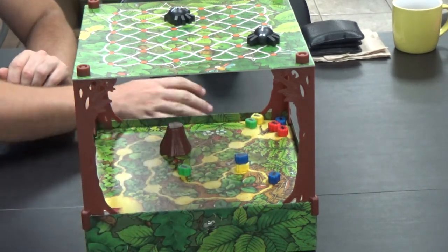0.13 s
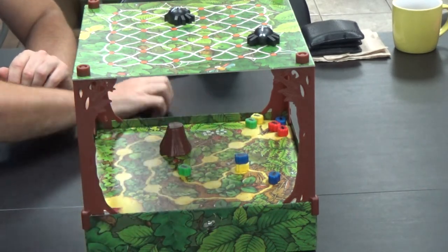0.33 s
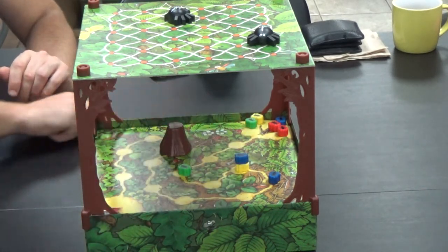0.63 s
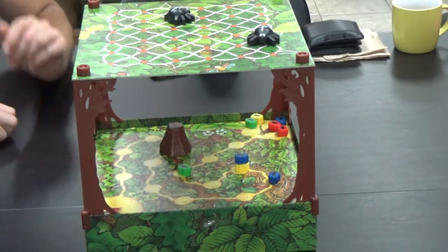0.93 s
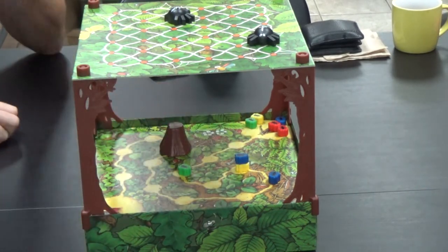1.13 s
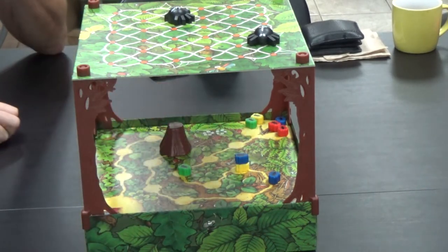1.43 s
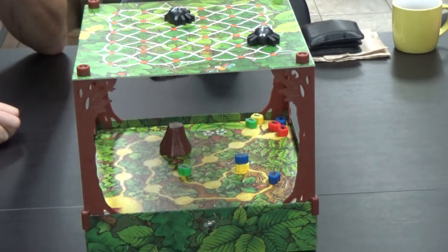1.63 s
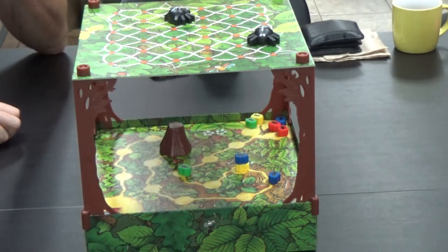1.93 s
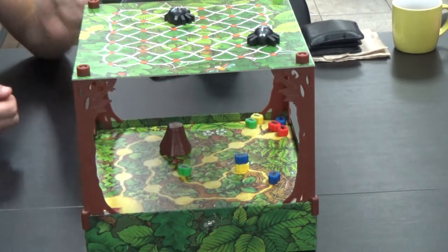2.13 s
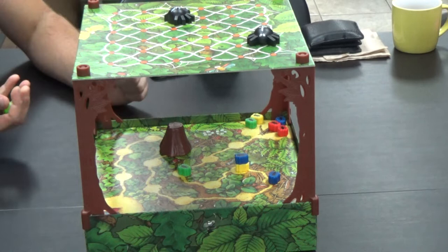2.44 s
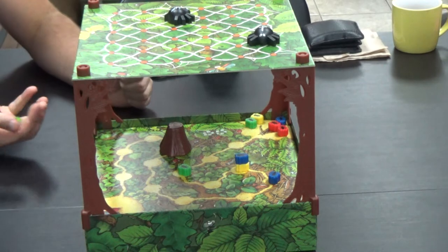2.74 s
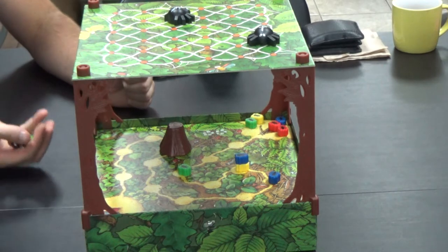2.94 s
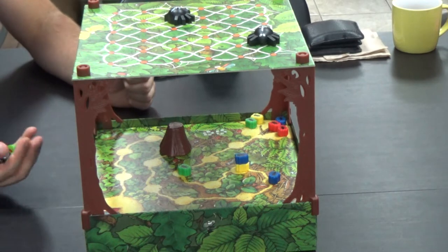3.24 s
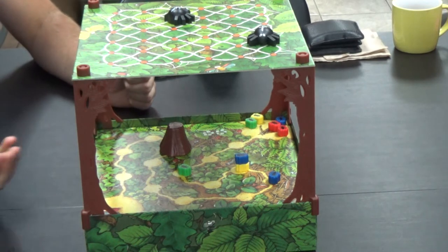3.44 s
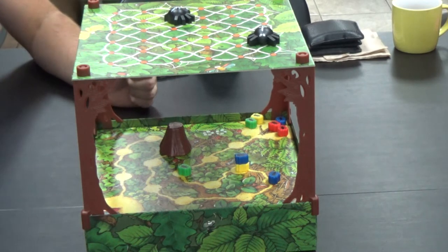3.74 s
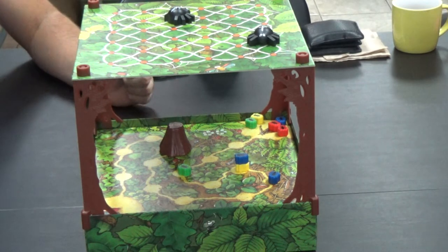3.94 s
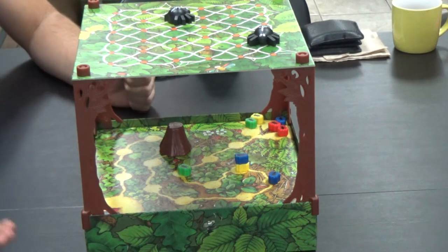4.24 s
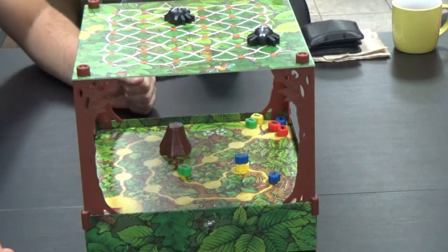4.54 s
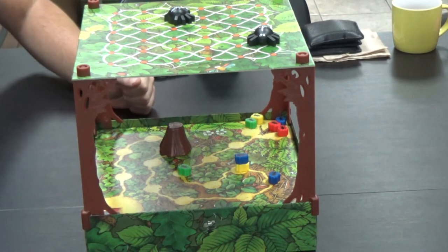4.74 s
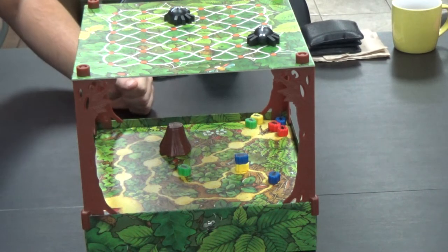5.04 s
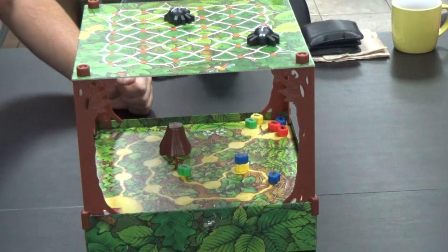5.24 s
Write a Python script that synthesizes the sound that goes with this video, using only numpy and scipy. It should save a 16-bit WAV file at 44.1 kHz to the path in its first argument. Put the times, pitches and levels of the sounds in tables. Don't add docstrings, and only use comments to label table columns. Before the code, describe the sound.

In a quiet humming room, small dice drag and click, a thin chain ticks, dice rattle in a hand and clatter out.

```python
import sys
import numpy as np
from scipy import signal
from scipy.io import wavfile
from scipy.ndimage import uniform_filter1d, minimum_filter1d

SR = 44100
rng = np.random.default_rng(int(sys.argv[2]) if len(sys.argv) > 2 else 0)


def gain_from_db(level_db):
    decades = np.asarray(level_db, float) / 20
    return 10 ** decades


def log_audio(samples):
    frames = np.atleast_2d(samples).T
    limited = np.clip(frames, -1, 1)
    pcm = np.round(limited * 32767).astype(np.int16)
    wavfile.write(sys.argv[1], SR, pcm)


N = 236947

# [f/Hz, level/dB per Hz]
AIR_COLOUR = [(18, -22), (28, -13), (42, -4), (62, -1.5), (100, -.5), (160, -2), (250, -8), (400, -12),
              (700, -16), (1700, -22), (4000, -26), (9000, -30), (13000, -32.5), (16000, -35)]
# [f/Hz, likeness/0-1]
AIR_SAME = [(30, .9995), (150, .999), (400, 0.73), (1200, 0.27), (4000, 0.48), (8000, .8), (12000, .97)]
# [f/Hz, level/dB rms, width/Hz]
HUM_TONES = [(119.5, -57, 13), (244.6, -73, 6.4), (357, -72.5, 5.4)]
# [f/Hz, t60/s]
ROOM_T60 = [(300, 0.26), (1500, 0.48), (3500, 0.36), (7000, 0.38), (12000, 0.2)]
# [f/Hz, level/dB]
ROOM_COLOUR = [(300, 6.5), (1500, 4.5), (3000, 1.5), (6000, -2.5), (9000, 0), (14000, 6.5)]
# [f/Hz, likeness/0-1]
ROOM_SAME = [(300, 1), (1200, 0.81), (4000, 0.74), (10000, 0.79)]
# [delay/ms, level/dB]
WALLS = [(3.1, -18), (5.2, -20), (7.3, -19), (15.2, -16)]
# [t/s, level/dB]
RUB_LEVEL = [(0.0, -51.5), (0.43, -43.5), (0.61, -47), (1.27, -58.5), (2.36, -62.5), (2.94, -68),
             (3.26, -65.5), (3.56, -66), (4.58, -59.5), (4.7, -48), (4.76, -49), (4.89, -43), (5.1, -61),
             (5.37, -60)]
# [f/Hz, level/dB per Hz]
RUB_COLOUR = [(180, -1), (300, 1.5), (600, -2), (1200, -3.5), (2500, -8.5), (4000, -11.5), (9000, -12),
              (12500, -26), (15500, -25)]
# [t/s, level/dB]
DRAG_LEVEL = [
    (0.0, -39),
    (0.062, -49),
    (0.072, -31),
    (0.184, -62),
    (0.254, -34),
    (0.42, -37),
    (0.49, -31.5),
    (0.53, -64),
    (0.62, -43),
]
# [t/s, first link level/dB, length/s]
WRIST_TURNS = [
    (1.1435, -38, .03),
    (1.313, -37, .09),
    (1.489, -39.5, .03),
    (1.677, -39, .08),
    (1.893, -40, .07),
]
# [f/Hz, level/dB, t60/s]
CHAIN_MODES = [(1200, -2, .012), (1500, -2, .012), (1820, -4, .015), (2145, -5, .04), (2960, -14, .035),
               (4780, -16, .04), (5340, -6, .12)]
# [t/s, level/dB]
KNUCKLE_TAPS = [
    (1.9773, -39.5),
]
# [f/Hz, level/dB, t60/s]
KNUCKLE_MODES = [(270, -1, 0.045), (487, -1, 0.037), (720, 2, 0.024), (1510, 2.5, 0.021), (1660, 0, 0.017),
                 (2400, 7.5, 0.0083)]
# [f/Hz, level/dB, t60/s]
TABLE = [(296.3, -24, 0.048), (480, -14.5, 0.043), (696, -16.5, 0.05), (1270, -8, 0.039),
         (1456, -1.5, 0.021), (2730, 3, 0.053), (3630, 1.5, 0.026), (4750, -11, 0.024), (7600, -5, 0.0087),
         (10800, -9, 0.007), (12960, -36, 0.0049)]
# [f/Hz, level/dB, t60/s]
PALM = [(971, -14, 0.024), (1700, -17, 0.014), (2180, 4.5, 0.0059), (3400, 0.5, 0.017), (5370, 3.5, 0.016),
        (9900, -4.5, 0.0041), (13600, -54, .003)]
# [t/s, click level/dB, click f/Hz, blow force level/dB]
SWEEP_HITS = [(0.0736, -21.5, 3030, -26), (0.0913, -42, 2920, -36), (0.112, -38, 3000, -48),
              (0.1705, -44, 6940, -48), (0.2216, -42, 2890, -26), (0.2367, -45, 2830, -45),
              (0.2568, -15, 4640, -10), (0.2603, -15, 4010, -31), (0.2862, -37, 3340, -35),
              (0.309, -25, 3550, -20), (0.3148, -13, 6200, -8), (0.3176, -13.5, 3860, -9.5),
              (0.3312, -38, 3100, -14), (0.3659, -25, 3230, -11), (0.3899, -13.5, 4460, -10),
              (0.4049, -11.5, 5900, -9), (0.4197, -32, 4360, -35), (0.4679, -15, 5800, -4),
              (0.4744, -24, 5900, -14), (0.4958, -29, 4440, -36), (0.9626, -41, 5850, -25),
              (0.9897, -46, 5880, -29.5), (1.0268, -45, 4100, -39), (2.796, -58, 2200, -36)]
# [t/s, click
# level/dB, click f/Hz, blow force level/dB]
PALM_HITS = [(1.2035, -29.5, 4000, -35), (1.2183, -34, 7700, -44), (1.6442, -38.5, 2800, -47),
             (1.7431, -44, 4070, -43), (2.0958, -42, 8000, -41.5), (2.4323, -27.5, 6810, -27.5),
             (2.5166, -36, 5300, -31), (2.5563, -40, 3780, -34), (2.5734, -49, 4510, -47),
             (2.6058, -36, 5440, -28.5), (2.7127, -26.5, 4900, -23), (2.7197, -35.5, 4700, -55),
             (2.876, -15.5, 6560, -17.5), (2.8831, -44, 4940, -18), (2.891, -27, 7000, -35),
             (2.8956, -28, 5400, -23.5), (2.9586, -45, 5000, -30), (2.9688, -27, 5470, -29),
             (3.0161, -27, 5370, -24.5), (3.023, -28, 5140, -19), (3.0329, -40, 5040, -56),
             (3.0437, -46, 4300, -55), (3.1662, -33.5, 5360, -27), (3.1782, -38, 4150, -28.5),
             (3.244, -35.5, 4250, -36), (3.2597, -36, 4670, -39), (3.3383, -13.5, 6960, -10.5),
             (3.3384, -19, 10300, -25), (3.3534, -29, 7060, -53), (3.444, -34, 4600, -48),
             (3.4694, -37, 4530, -39), (3.4906, -33, 4800, -44), (3.5309, -37, 5830, -39),
               (3.5692, -27, 4840, -29.5), (3.5764, -37, 4230, -40), (3.6028, -29.5, 3800, -28),
               (3.625, -44, 4980, -42), (3.6457, -41, 4710, -45), (3.6715, -34, 5290, -28),
               (3.69, -29, 5360, -39), (3.7046, -36, 6570, -17), (3.7086, -19.5, 5970, -23),
               (3.7225, -29, 6100, -23), (3.7272, -37, 5140, -23), (3.8298, -43, 3990, -55),
               (3.8478, -38, 4600, -53), (3.8793, -31, 5500, -22), (3.9827, -39, 4790, -37),
               (4.0033, -28.5, 4300, -42), (4.0429, -18.5, 6250, -16), (4.0594, -18.5, 5400, -14.5),
               (4.062, -23.5, 4000, -18.5), (4.075, -38, 5370, -28), (4.1349, -26, 6140, -21.5),
               (4.1816, -28, 5600, -24.5), (4.21, -28.5, 5800, -41), (4.2598, -27.5, 5370, -41),
               (4.2654, -26.5, 6500, -25), (4.4623, -27, 6060, -26.5), (4.4787, -37, 6400, -47)]
# [t/s, click level/dB, click f/Hz, blow force level/dB]
ROLL_HITS = [(4.539, -5, 4550, -1), (4.5523, -34, 3080, -9), (4.5761, -30, 3060, -10.5),
             (4.6323, -5.5, 4570, -2), (4.6607, 5.5, 5600, 5), (4.6628, 4, 6850, 12),
             (4.7146, -4, 4360, 3.5), (4.7226, 0, 3980, -3), (4.7392, -6.5, 3860, -4),
             (4.7899, -1, 6020, 2), (4.7966, -2, 5160, -8), (4.8058, 0, 5640, 4), (4.8312, -7, 4170, -13.5),
             (4.8555, -3, 5800, -6), (4.8614, -1, 5910, 1), (4.8702, -8, 3650, -10),
             (4.8892, -13, 5040, -7), (4.8927, -7, 6100, -12), (4.919, -18, 3420, -6.5),
             (4.9396, -23, 3300, -10), (4.9844, -3, 5130, -2), (5.0154, -10, 5780, -15),
             (5.0305, -27, 4900, -15), (5.0478, -8, 5550, -5.5), (5.0662, -12.5, 5500, -12.5),
             (5.1667, -11, 4680, -9), (5.2384, -22.5, 4200, -16.5), (5.2732, -26, 4270, -22),
             (5.2936, -25.5, 4550, -20.5), (5.3141, -33, 4270, -40)]
# [left over right level/dB, knock level at a -20 dB blow/dB,
# share of extra force reaching the body/0-1, click spread at 3 kHz/Hz, click spread at 6 kHz/Hz]
SWEEP_PLACE = (0, -39, 0.6767, 552, 1403)
PALM_PLACE = (2.6, -35.5, 0.47, 748, 932)
ROLL_PLACE = (1.3, -34.5, 0.8319, 573, 1425)
# [lift level/dB, bounce delay/ms, bounce level/dB]
SWEEP_PATH = (-4, 1.3, -3)
PALM_PATH = (2.5, 2.3, -12)
ROLL_PATH = (2.5, .8, -5)


def evened(x):
    return x / np.sqrt(np.mean(x ** 2) + 1e-20)


def read(points, hz):
    f, value = np.transpose(points)
    return np.interp(np.log(hz + 1), np.log(f + 1), value)


def curve(rows):
    s, db = np.transpose(rows)
    return gain_from_db(np.interp(np.arange(N) / SR, s, db, right=-150))


def add(mix, s, sound):
    part = mix[round(s * SR):][:len(sound)]
    part += sound[:len(part)]


def shaped_noise(colour, same, patchy_db, size):
    frames, hz = 4 * N // size + 5, np.fft.rfftfreq(size, 1 / SR)
    a, b, c, d, patches = rng.standard_normal((frames, len(hz), 5)).T
    patches = uniform_filter1d(patches, size // 64, 0)
    patches = evened(uniform_filter1d(patches, 8192 // size, 1))
    like = np.clip(read(same, hz), 0, 1)[:, None]
    left = a + 1j * b
    right = like * left + np.sqrt(1 - like ** 2) * (c + 1j * d)
    z = np.array([left, right]) * gain_from_db(read(colour, hz)[:, None] + patchy_db * patches)
    noise = signal.istft(z, nperseg=size, noverlap=size * 3 // 4)[1]
    return evened(noise[:, :N])


def ring(modes, spread_db, detune, size=4000):
    hz, db, t60 = np.transpose(modes)[:, :, None]
    luck, t = rng.standard_normal((3, len(modes), 1)), np.arange(size) / SR
    waves = np.sign(luck[0]) * np.sin(2 * np.pi * hz * (1 + detune * luck[1]) * t)
    decay = gain_from_db(db + spread_db * luck[2] - 60 * t / t60)
    blow = (1 - np.exp(-t / 6e-5)) * np.cos(np.pi / 2 * t / t[-1])
    return blow * (decay * waves).sum(0) / np.linalg.norm(gain_from_db(db))


def knock(body, count=52):
    corner_hz, db, t60 = np.transpose(body)
    hz = np.geomspace(corner_hz[0], corner_hz[-1], count)
    modes = np.transpose([hz, read(np.c_[corner_hz, db], hz), read(np.c_[corner_hz, t60], hz)])
    return ring(modes, spread_db=2.5, detune=.03, size=1100)


def click(db, hz, spread_hz):
    t, turn = (np.arange(80) - 30) / SR, rng.random(2)
    body = np.exp(-(9 * spread_hz * t) ** 2 / 2) * np.cos(2 * np.pi * (hz * t + turn[0]))
    edge = np.exp(-(14000 * t) ** 2 / 2) * np.cos(2 * np.pi * (1.95 * hz * t + turn[1]))
    return gain_from_db(db) * (body + gain_from_db(-26.5) * edge)


def air():
    return gain_from_db(-55) * shaped_noise(AIR_COLOUR, AIR_SAME, patchy_db=.8, size=4096)


def hum():
    t, x = np.arange(N) / SR, 0
    for hz, db, width in HUM_TONES:
        r = np.exp(-np.pi * width / SR)
        wander = signal.lfilter([1], [1, -r], rng.standard_normal((N, 2)) @ [1, 1j])
        carrier = 1.7 + wander / np.sqrt(np.mean(abs(wander) ** 2))
        x = x + gain_from_db(db) * evened((carrier * np.exp(2j * np.pi * hz * t)).real)
    return x


def room(x):
    size = int(.6 * SR)
    hz, t, z = signal.stft(rng.standard_normal((3, 2, size)), SR, nperseg=256)
    like = np.clip(read(ROOM_SAME, hz), 0, 1)[:, None]
    z = np.stack([z[:, 0], like * z[:, 0] + np.sqrt(1 - like ** 2) * z[:, 1]], 1)
    z = z * gain_from_db(read(ROOM_COLOUR, hz)[:, None] - 60 * t / read(ROOM_T60, hz)[:, None])
    tails = signal.istft(z, SR, nperseg=256)[1][..., :size]
    tails = tails * (1 - np.exp(-np.arange(size) / SR / .003))
    tails = tails / np.sqrt((tails ** 2).sum(-1).mean())
    for k, (ms, db) in enumerate(WALLS):
        sides = np.array([1, .8])[::(-1) ** k]
        tails[:, :, round(ms * SR / 1000)] += gain_from_db(db) * sides
    turn = np.arange(N) / SR * 2 * np.pi * 7
    feeds = [x * np.cos(turn + k * np.pi / 3) * np.sqrt(2 / 3) for k in range(3)]
    return sum(signal.fftconvolve(f[None], tail, axes=1)[:, :N] for f, tail in zip(feeds, tails))


def rub():
    return gain_from_db(-1.5) * curve(RUB_LEVEL) * shaped_noise(RUB_COLOUR, ROOM_SAME, patchy_db=1.5, size=512)


def drag():
    slips_per_s, shape = 1500, (N // 8, 16)
    happens = rng.random(shape) < slips_per_s / 16 / SR
    strength = gain_from_db(3 * np.minimum(rng.exponential(1, shape), 3))
    slips = happens * strength
    x = sum(signal.oaconvolve(s, knock(TABLE)) for s in slips.T)
    return gain_from_db(-9.5) * curve(DRAG_LEVEL) * np.pad(evened(x), (0, N - len(x)))


def links():
    gap_s, settle_db, fade_db_per_s = .024, -3, -40
    return [(s + lag, db + (lag > 0) * settle_db + fade_db_per_s * lag)
            for s, db, length in WRIST_TURNS for lag in np.arange(0, length, gap_s)]


def chain():
    x = np.zeros(N)
    for s, db in links():
        fade = np.exp(-np.arange(600) / SR / 0.0021)
        chatter = rng.standard_normal(600) * fade * (rng.random(600) < .08)
        chatter[0] = 3
        link = gain_from_db(-8) * ring(CHAIN_MODES, spread_db=1.5, detune=0.002, size=2600)
        add(link, 0, gain_from_db(-9) * knock(PALM))
        add(link, 0, click(-1, hz=7000, spread_hz=1000) + click(-1, hz=9400, spread_hz=1200))
        add(x, s, gain_from_db(db) * signal.fftconvolve(link, chatter / np.linalg.norm(chatter)))
    return x


def knuckle():
    x = np.zeros(N)
    for s, db in KNUCKLE_TAPS:
        add(x, s, gain_from_db(db) * ring(KNUCKLE_MODES, spread_db=1.0, detune=0.0045))
    return x


def dice(hits, place, path, body):
    lift_db, bounce_ms, bounce_db = path
    pan_db, knock_db, share, dull_spread_hz, bright_spread_hz = place
    direct, send = np.zeros((2, N))
    for s, db, hz, force_db in hits:
        octaves = np.log2(hz / 3000)
        spread_hz = max(dull_spread_hz + (bright_spread_hz - dull_spread_hz) * octaves, 400)
        spread_hz = spread_hz * gain_from_db(-0.02 * (db + 20))
        tick, start = click(0, hz, spread_hz), s - 30 / SR
        thud_db = share * (force_db + 20) + knock_db - 4.5 * octaves + 6
        thud = gain_from_db(thud_db) * knock(body)
        add(send, start, gain_from_db(force_db) * tick)
        add(send, s, gain_from_db(0.73) * thud)
        add(direct, start, gain_from_db(db + lift_db) * tick)
        bounce_s = bounce_ms * rng.uniform(.9, 1.15) / 1000
        add(direct, start + bounce_s, gain_from_db(db + lift_db + bounce_db) * tick)
        add(direct, s, thud)
    high_pass = signal.butter(2, 320, "high", fs=SR)
    direct, send = signal.lfilter(*high_pass, [direct, send])
    return direct * gain_from_db(np.array([[pan_db], [-pan_db]]) / 2), send


def scene():
    swept, swept_send = dice(SWEEP_HITS, SWEEP_PLACE, SWEEP_PATH, TABLE)
    held, held_send = dice(PALM_HITS, PALM_PLACE, PALM_PATH, PALM)
    thrown, thrown_send = dice(ROLL_HITS, ROLL_PLACE, ROLL_PATH, TABLE)
    slide, knocks = drag(), chain() + knuckle()
    send = swept_send + held_send + thrown_send + gain_from_db(4.5) * slide + gain_from_db(5) * knocks
    reverb = gain_from_db(np.array([[.3], [-.3]])) * room(send)
    return swept + held + thrown + slide + knocks + reverb + rub() + air() + hum()


def band_limit(x):
    return signal.sosfilt(signal.butter(12, 16810, fs=SR, output="sos"), x)


def record(dry):
    limit_db, recovery_db_per_s, edge_hz = -3.1, 170, 16300
    headroom_db = np.minimum(limit_db - 20 * np.log10(abs(dry).max(0) + 1e-9), 0)
    rise = np.arange(N) * recovery_db_per_s / SR
    held_db = np.minimum.accumulate(minimum_filter1d(headroom_db, size=161) - rise) + rise
    gain = gain_from_db(uniform_filter1d(np.minimum(held_db, 0), size=80))
    low_pass = signal.firwin(255, edge_hz, window=("kaiser", 8), fs=SR)
    mix = signal.oaconvolve(dry * gain, low_pass[None], "same")
    return band_limit(mix)


dry = scene()
out = record(dry)
log_audio(out)
```